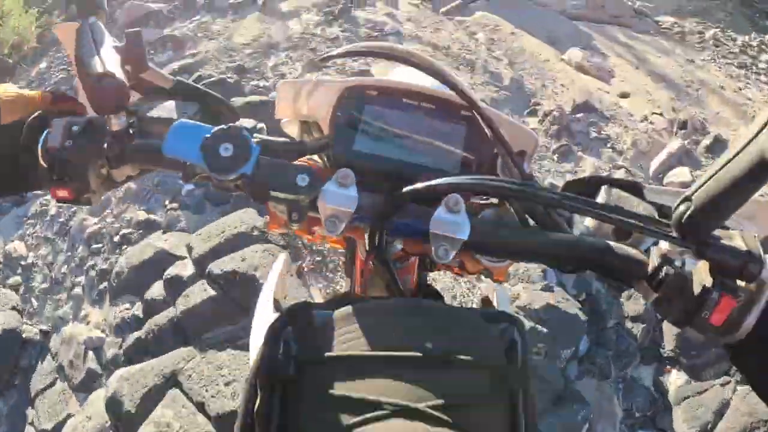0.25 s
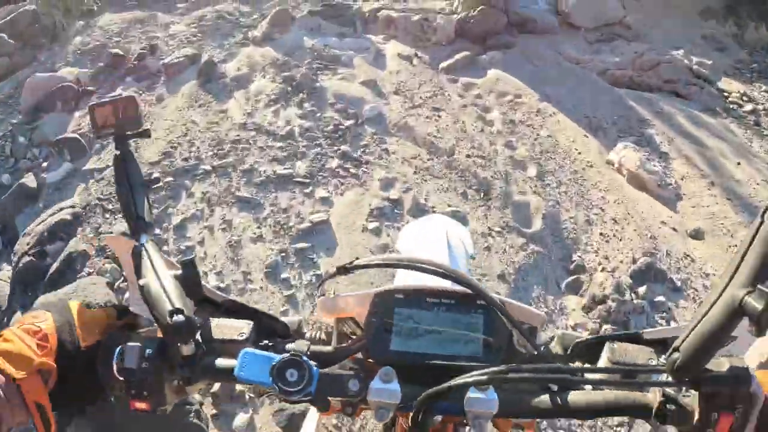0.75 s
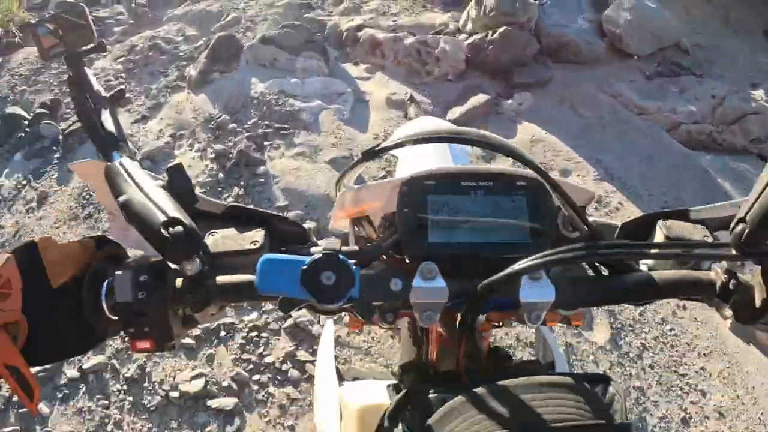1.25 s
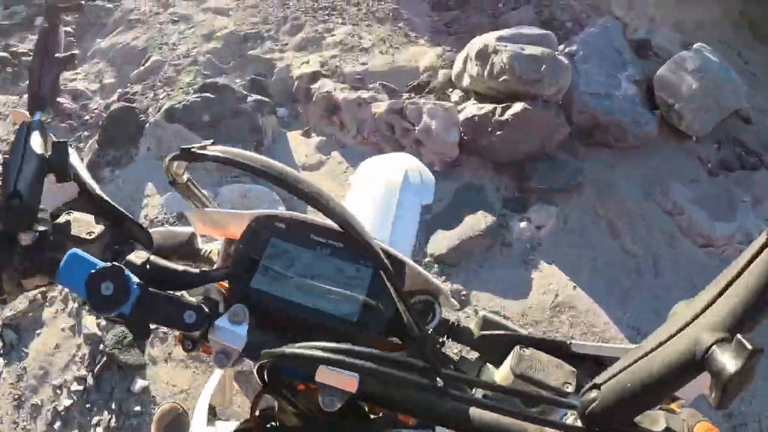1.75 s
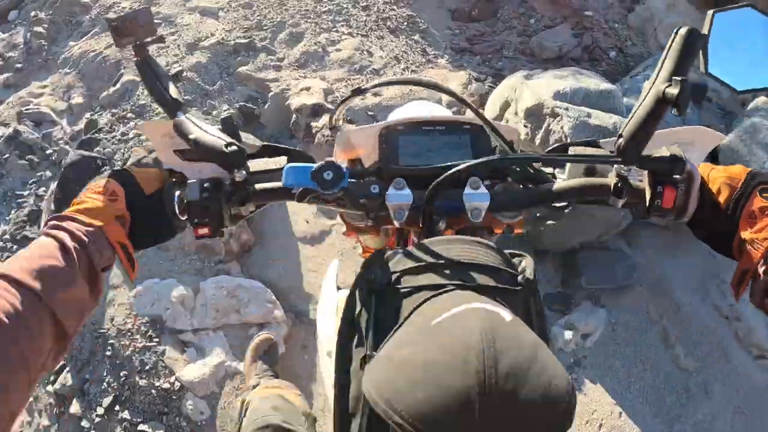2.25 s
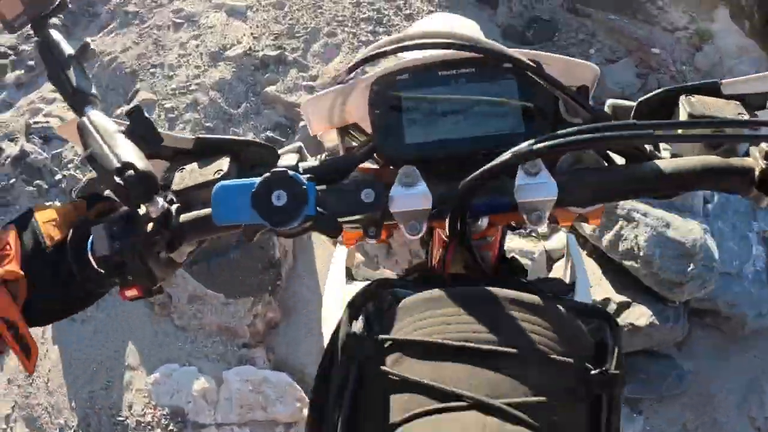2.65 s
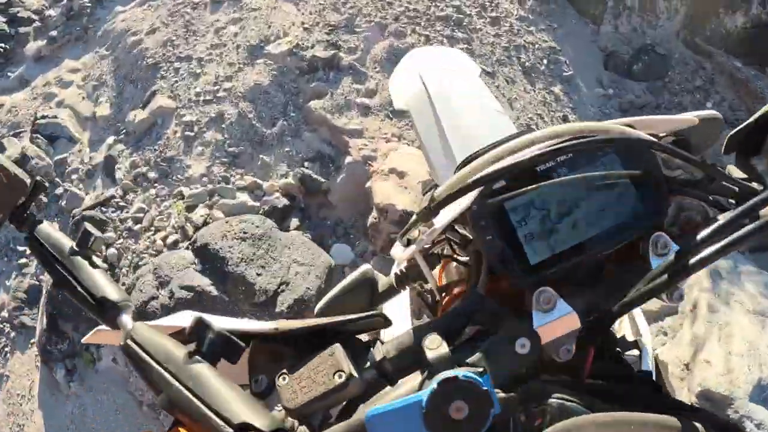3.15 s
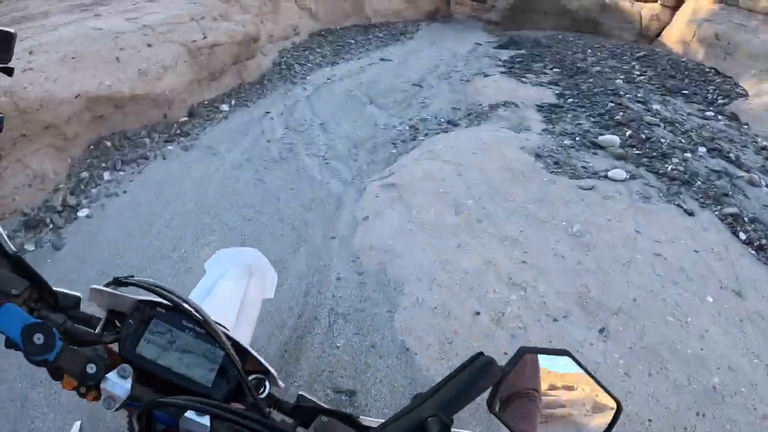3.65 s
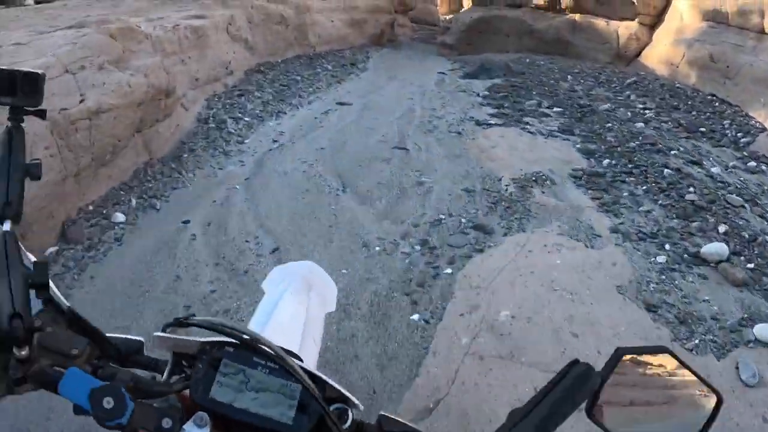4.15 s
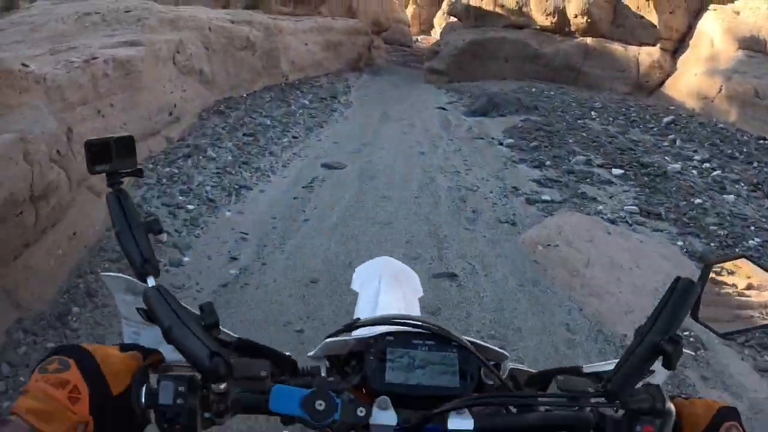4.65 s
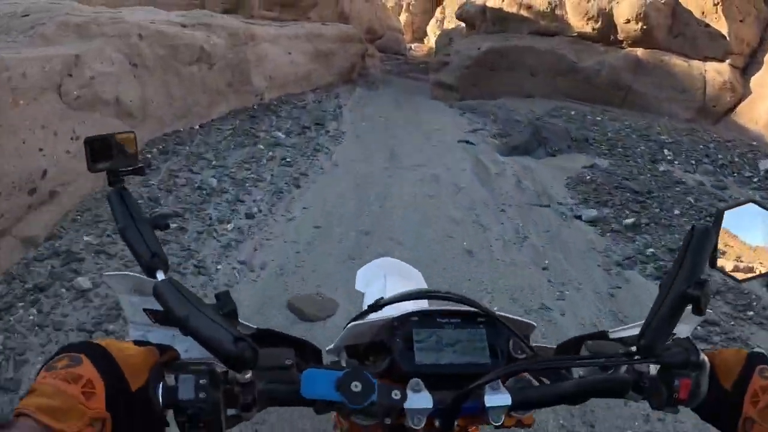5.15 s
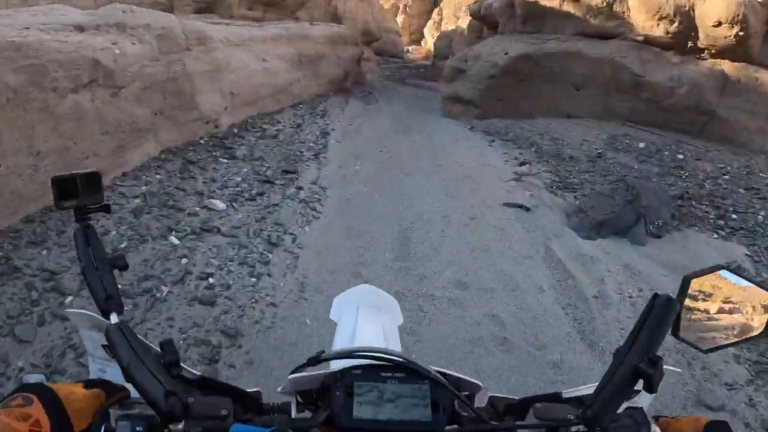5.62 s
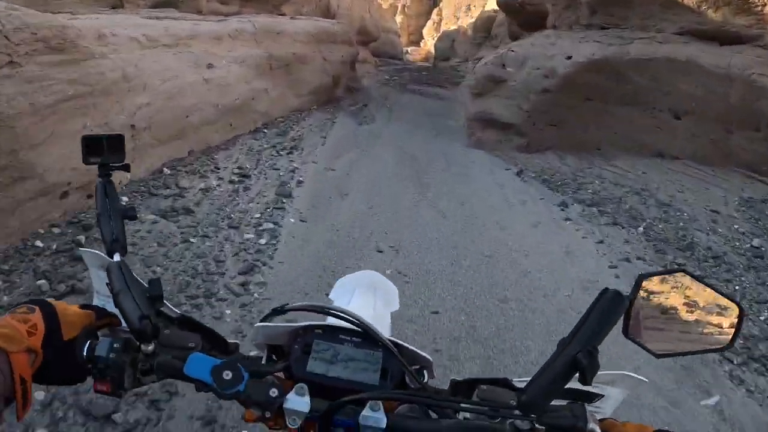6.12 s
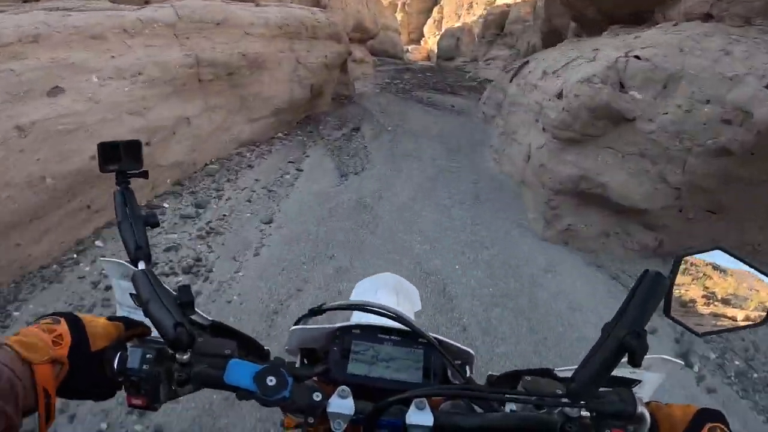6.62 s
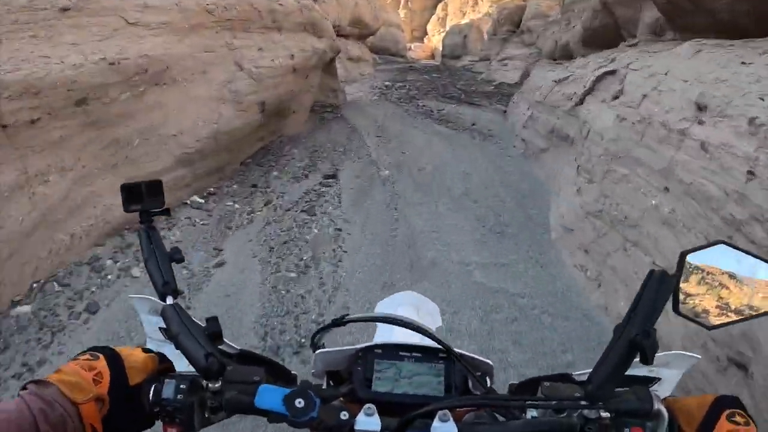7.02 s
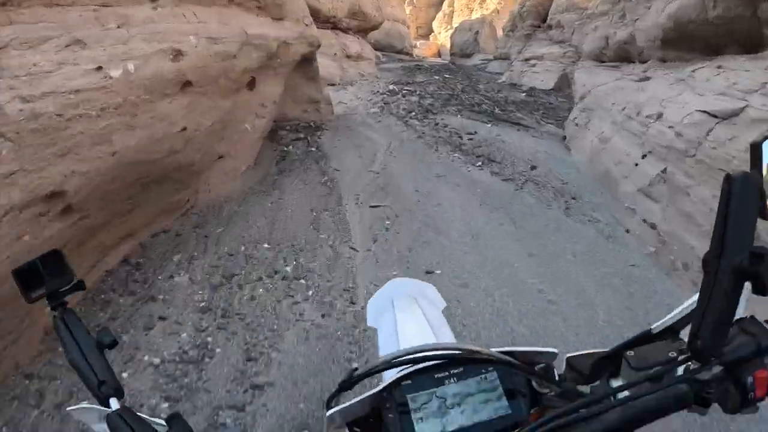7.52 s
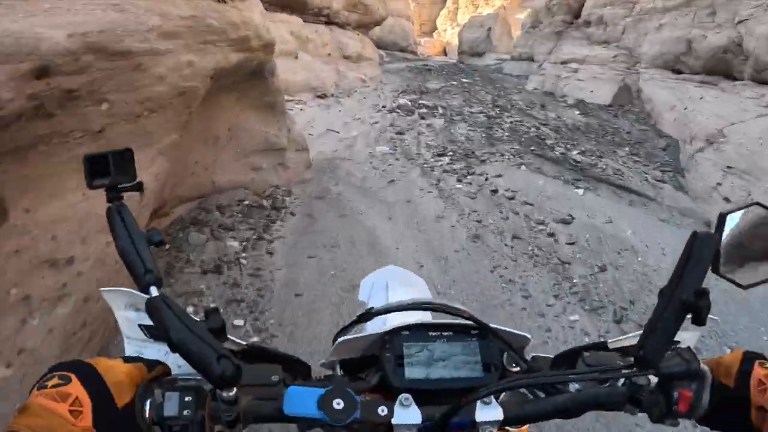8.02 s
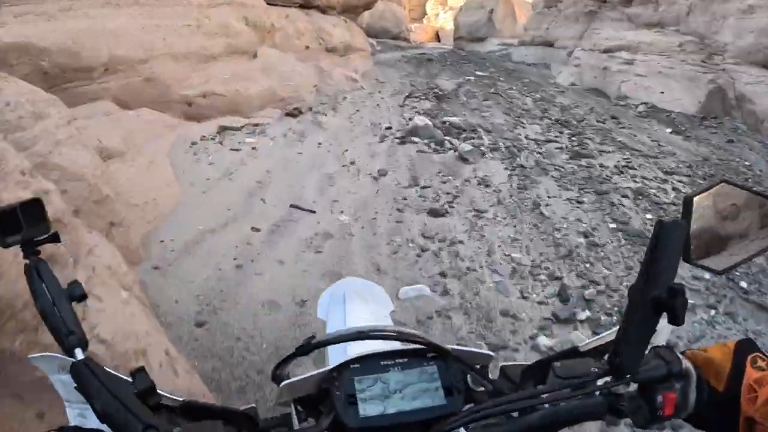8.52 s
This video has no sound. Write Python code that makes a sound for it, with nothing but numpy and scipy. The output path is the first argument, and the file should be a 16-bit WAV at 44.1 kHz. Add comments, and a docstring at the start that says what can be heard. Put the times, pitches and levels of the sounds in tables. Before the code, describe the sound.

A four-stroke single-cylinder dirt bike, heard close from the rider's chest outdoors. From 0 to 0.8 s it chugs at about 25 beats a second, dips and blips, with boxy intake thumps. The throttle closes and the beat slows to about 13 a second by 2 s: separate gritty knocks, valve ticking, soft gravel hiss and sharp stone clicks, strongest near 1.85 and 2.03. A surge runs from 2.1 to 2.7, then it sags to a lugging low near 3.1. At 3.25 it abruptly becomes a full, steady burble around 30 beats, swelling near 4.2, dropping at 4.5, climbing again to 5.7, with light clatter and whine. At 6.9 the throttle shuts and revs fall; at 7.3 it pulls hard with rasp, a click and louder gravel crunch, peaking near 7.6. It eases around 8.2, blips, and ends mid-ride near 8.8.

```python
"""On a rocky trail that turns to a gravel wash: a four-stroke single-cylinder dirt bike, from the rider's chest.
Each intake gulp rings the airbox as filtered impulses and noise; exhaust puffs ring the silencer.
Crank shake, valve clatter and gear whine follow the same engine cycle.
Tyres drum and crunch as shaped noise; stones and engine knocks sound as short ringing bursts."""
import sys
import numpy as np
from scipy import signal
from scipy.fft import rfft, irfft
from scipy.io import wavfile
from scipy.ndimage import uniform_filter1d

SR = 44100
rng = np.random.default_rng(int(sys.argv[2]) if len(sys.argv) > 2 else 0)


def pcm_store(signal):
    """Save signal as 16-bit PCM."""
    levels = np.round(np.clip(np.atleast_2d(signal), -1, 1) * 32767)
    wavfile.write(sys.argv[1], SR, levels.astype(np.int16).T)


N = 387198
TIME = np.arange(N) / SR
CRUISE_HZ = 30  # firings per second


def undb(db):
    """Decibels to gain."""
    return 10 ** (np.asarray(db) / 20)


def unit(x):
    """Scale to rms 1."""
    return x / np.sqrt(np.mean(x ** 2))


def curves(table):
    """Draw each column of a table as a control signal over time."""
    times, *columns = np.transpose(table)
    return [np.interp(TIME, times, column) for column in columns]


def noise():
    """White noise."""
    return rng.standard_normal(N)


def band(x, hz, width_hz, order=1):
    """Bandpass as a resonance; a higher order acts as several coupled ones."""
    low = np.sqrt(hz ** 2 + width_hz ** 2 / 4) - width_hz / 2
    high = min(low + width_hz, SR / 2 - 1)
    return signal.sosfilt(signal.butter(order, [low, high], "band", fs=SR, output="sos"), x)


def resonances(x, modes, order=1):
    """Sum of parallel resonances from (hz, width_hz, level_db) rows."""
    return sum(undb(level_db) * band(x, hz, width_hz, order) for hz, width_hz, level_db in modes)


def colour(x, points):
    """Shape a spectrum by (hz, level_db) points, then scale to rms 1."""
    hz, level_db = np.transpose(points)
    f = np.arange(N // 2 + 1) * SR / N
    gain = undb(np.interp(np.log(f + 1), np.log(hz), level_db))
    return unit(irfft(rfft(x) * gain, N))


def walk(rate_hz):
    """Smooth random drift of rms 1."""
    hold = int(SR / rate_hz)
    steps = np.repeat(rng.standard_normal(N // hold + 1), hold)
    return unit(uniform_filter1d(steps, hold)[:N])


def fade(x, seconds):
    """Give every impulse an exponential tail."""
    return signal.lfilter([1], [1, -np.exp(-1 / (seconds * SR))], x)


def strokes(cycle, place, scatter_db, jitter_s):
    """One impulse per engine cycle at a given place in it, each a little different."""
    times = np.interp(np.arange(1, int(cycle[-1])) + place, cycle, TIME)
    chance = rng.standard_normal((len(times), 2))
    at = ((times + jitter_s * chance[:, 0]) * SR).astype(int)
    out = np.zeros(N)
    out[np.clip(at, 0, N - 1)] = undb(scatter_db * chance[:, 1])
    return out


def bump(cycle, place, length):
    """A smooth bell-shaped gate that opens once per cycle."""
    return np.exp(-.5 * (((cycle - place + .5) % 1 - .5) / length) ** 2)


def kick(cycle, place, length):
    """A gate that snaps open once per cycle and dies away."""
    return np.exp(-((cycle - place) % 1) / length)


SHUT_DB, OPEN_DB = -19, -8  # gulp levels that count as throttle shut and open


def closure(gulp_db):
    """How far the throttle is shut, 0-1, judged from the gulp level."""
    return np.clip((OPEN_DB - gulp_db) / (OPEN_DB - SHUT_DB), 0, 1)


# longer-ringing airbox modes: hz [Hz], width_hz [Hz], level_db [dB]
AIRBOX_MODES = [(249, 11.7, 1.5), (312.4, 93, 7)]


def airbox(x):
    """The thump of the coupled airbox resonances feeds its longer-ringing modes."""
    thump = band(x, 260.1, 103.0, order=4) + undb(-11.0) * band(x, 197.6, 153.0, order=2)
    return thump + resonances(thump, AIRBOX_MODES)


# upper inlet resonances before transposition: hz [Hz], width_hz [Hz], level_db [dB]
INLET_MODES = [(363, 35, -11.5), (472, 41, -19), (555.5, 67, -15.5), (661, 58, -25)]
# upper inlet resonance gains: start_s [s], bark_db [dB], snarl_db [dB]
BARK_LEVELS = [(0, 6, -28), (.75, 9, -17), (1.3, -2, -19), (2.0, 2, -33), (2.4, 11, -29), (2.7, -2, -16),
               (3.2, 4.5, -29), (3.7, 4, -41), (4.2, 4, -41), (4.5, 2, -27), (4.8, 3, -27.5),
               (5.6, 3.5, -31), (6.3, 4.5, -30.5), (7.4, 3.5, -31), (8.78, -3, -28)]
# airbox pitch; each ring is transposed by its ratio to the rest pitch: start_s [s], pitch_hz [Hz]
AIRBOX_DRIFT = [(0, 274.6), (.45, 265.5), (.8, 278.5), (1.5, 266), (2.1, 270.7), (2.45, 272.4), (3.3, 271),
                (4.2, 271.4), (4.58, 259), (4.9, 268.5), (5.6, 266.7), (5.85, 268), (6.4, 266.6),
                (7.4, 265.7), (7.8, 273.6), (8.78, 266.5)]
AIRBOX_REST_HZ = 274
OPENING_LEAD_S, OPENING_DB = 0.01122, -18  # weak puff ahead of the gulp
SHUT_ROUGH, OPEN_ROUGH = 0.55, 0.04  # turbulent share of the gulp, 0-1


def intake(cycle, gulp_db):
    """Each gulp of air rings the airbox at a drifting pitch; a nearly shut throttle makes it turbulent."""
    rough = np.clip(OPEN_ROUGH + (SHUT_ROUGH - OPEN_ROUGH) * closure(gulp_db) ** 2, 0, 1)

    # the rings of one push of air
    age = np.arange(SR // 8) / SR
    push = signal.unit_impulse(len(age))
    boom = airbox(push)
    bark = band(resonances(push, INLET_MODES, order=2), 521, 330, order=3)
    snarl = band(push, 769, 264, order=5)
    opening = band(push, 315.8, 100, order=3)
    opening = undb(OPENING_DB) * opening / opening.max()

    bark_s, bark_db, snarl_db = np.transpose(BARK_LEVELS)
    ring = np.zeros(N)
    for s in np.interp(np.arange(1, int(cycle[-1]) + 1), cycle, TIME):
        span = slice(max(int((s - OPENING_LEAD_S) * SR), 0), int(s * SR) + len(age))
        transpose = np.interp(s, *np.transpose(AIRBOX_DRIFT)) / AIRBOX_REST_HZ
        since = (TIME[span] - s) * transpose
        gulp = boom + undb(np.interp(s, bark_s, bark_db)) * bark
        gulp = gulp + undb(np.interp(s, bark_s, snarl_db)) * snarl
        ring[span] += np.interp(since, age, gulp / boom.max())
        ring[span] += np.interp(since + OPENING_LEAD_S, age, opening)

    # air tears past the throttle plate while the inlet valve is open
    flow = bump(cycle, 0, .11) + 1.3 * rough ** 2 + .1
    rush = unit(airbox(noise() * flow))
    clean = undb(-1.0) * np.sqrt(1 - rough ** 2) * ring
    return undb(gulp_db) * (clean + undb(-7) * rough * rush)


# cylinder and header pipe modes: hz [Hz], width_hz [Hz], level_db [dB]
HEADER_MODES = [(547.4, 42, 5), (812, 112, -8)]


def combustion(cycle, level_db):
    """Every power stroke rings the cylinder and header pipe with a short hollow note."""
    blow = strokes(cycle, .57, scatter_db=1.3, jitter_s=.00003)
    return undb(level_db) * unit(resonances(blow, HEADER_MODES, order=2))


# silencer resonances: hz [Hz], width_hz [Hz], level_db [dB]
SILENCER_MODES = [(110, 3.7, -6), (159, 18, 3), (206, 52, 9.5), (533, 11, 9)]


def exhaust(cycle, gulp_db):
    """Puffs ring the silencer; they grow with the throttle and are heavier when the engine lugs."""
    blowdown = strokes(cycle, .9, scatter_db=1.2, jitter_s=.00004)
    sweep = strokes(cycle, .63, scatter_db=1.5, jitter_s=.00008)
    pipe = resonances(blowdown + undb(2) * sweep, SILENCER_MODES)
    heavy = (CRUISE_HZ / (np.gradient(cycle) * SR)) ** .8
    return undb(-35.0 + 1.1 * gulp_db) * heavy * unit(band(pipe, 202, 600, order=3))


LUG_HZ, SMOOTH_HZ = 7.8, 26.6  # firings per second: full below the first, gone above the second


def lugging(cycle, firing_hz):
    """At low revs every power stroke knocks as a gritty burst, and air hisses past the throttle plate."""
    share = np.clip((SMOOTH_HZ - firing_hz) / (SMOOTH_HZ - LUG_HZ), 0, 1)
    grit = noise() * undb(3 * walk(700))
    body = band(band(grit, 1300, 2100, order=2), 2400, 3000)
    burst = unit(body + undb(2) * band(grit, 2536, 170, order=2))
    thud = undb(-28.0) * bump(cycle, place=.64, length=.085) * burst
    air = unit(band(noise(), 8740, 3000, order=3))
    hiss = undb(-47.5 + .8 * walk(15.0)) * bump(cycle, place=0.15, length=0.053) * air
    return share * (thud + hiss)


# crank shake lines before the panels: order [multiple of the firing rate], level_db [dB]
SHAKE_ORDERS = [(2, -1), (3, -32.5), (4, -2), (5, -1), (6, -5), (7, -5.5)]


def shake(cycle, level_db):
    """The unbalanced piston shakes the bike; crank orders swell near the body panels' resonance."""
    lines = sum(undb(order_db + 1.5 * walk(6)) * np.sin(2 * np.pi * order * cycle)
                for order, order_db in SHAKE_ORDERS)
    return undb(level_db) * unit(band(band(lines, 125.7, 71), 138.0, 100))


def tooth_load(cycle):
    """Gear teeth are pressed hardest on the power stroke and again as the inlet cam lifts."""
    return 0.45 + bump(cycle, 0.64, 0.098) + 0.5 * bump(cycle, 0.068, 0.14)


# gear meshes: teeth [per cycle, rounded when played], slow_db [dB, low revs], fast_db [dB, cruise]
GEAR_MESHES = [(52, -3, -14.5), (63.23, 1, 5.5), (82.2, -4, -14.5), (90.2, -12.5, -4.5),
               (105.3, -6.5, -9.5), (128.2, -5.5, -2.5)]
SURGE = .014  # share by which the crank speeds up and slows down in a cycle at cruise; more at low revs


def gears(cycle, whine_db):
    """Gear meshes whine, smeared by backlash and crank surge, and ring through the cases."""
    firing_hz = np.gradient(cycle) * SR
    drive = np.clip((firing_hz - 28.5) / 1.5, 0, 1)  # from low revs to cruise
    surge = SURGE * (CRUISE_HZ / firing_hz) ** 2 * np.sin(2 * np.pi * cycle) / (2 * np.pi)
    mesh = np.zeros(N)
    for teeth, slow_db, fast_db in GEAR_MESHES:
        backlash = .55 + walk(170) + 1j * walk(170)
        tone = np.exp(2j * np.pi * round(teeth) * (cycle + surge))
        mesh += undb(slow_db + (fast_db - slow_db) * drive) * (tone * backlash).real
    whine = band(tooth_load(cycle) * mesh, 1840, 2300, order=2)
    return undb(whine_db - 7.0) * unit(whine + undb(-2) * band(whine, 1500, 280))


# clutch cover modes: hz [Hz], width_hz [Hz], level_db [dB]
COVER_MODES = [(2093, 81, -1), (2955, 130, -13), (3410, 130, -14)]


def cover(cycle, level_db):
    """Chattering gear teeth set a clutch cover singing, in pulses with the load."""
    load = tooth_load(cycle)
    song = resonances(load * noise(), COVER_MODES, order=2)
    return undb(level_db) * unit(load * song)


# drive train resonances: hz [Hz], width_hz [Hz], level_db [dB]
RASP_MODES = [(1286, 283, -3), (1800, 590, -1.5), (2080, 160, -11.5), (2540, 160, -3.5), (3554, 210, -6.5)]


def rasp(cycle, level_db):
    """Under load the drive train chatters in rough bursts within each cycle."""
    gate = .5 + kick(cycle, .64, .3) + .6 * kick(cycle, .04, .2)
    chatter = noise() * undb(2.5 * walk(400)) * gate
    return undb(level_db) * unit(resonances(chatter, RASP_MODES, order=2))


# clatter level before trim: cruise_db [dB], speed_db [dB per doubling of speed],
# pull_db [dB at full pull], shut_db [dB with the throttle shut]
CLATTER_LEVEL_LAW = (-35, 1, 3.5, -3)
FULL_PULL_HZ_PER_S, PULL_S = 72, 0.5  # gain in firing rate that counts as full pull; averaging time


def clatter_level(firing_hz, gulp_db):
    """Clatter follows the speed, how hard the engine pulls, and the throttle."""
    cruise_db, speed_db, pull_db, shut_db = CLATTER_LEVEL_LAW
    gaining = np.clip(np.gradient(firing_hz) * SR / FULL_PULL_HZ_PER_S, 0, 1)
    pull = uniform_filter1d(gaining, int(PULL_S * SR))
    speed = np.log2(firing_hz / CRUISE_HZ)
    return cruise_db + speed_db * speed + pull_db * pull + shut_db * closure(gulp_db)


# knocks of exhaust valve, combustion, and a further late knock: place [0-1 of cycle], length [cycles], level_db
# [dB]
CYCLE_KNOCKS = [(.04, 0.64, 4), (0.66, 0.23, 5), (.8, .1, 2.5)]
# engine case modes: hz [Hz], width_hz [Hz], level_db [dB]
CASE_MODES = [(1920, 180, 6.5), (2420, 210, -7.5), (3370, 360, -5.5), (3860, 640, -1), (5200, 210, 3),
              (6100, 78, 3.5), (6970, 280, -7)]
# clatter spectrum: hz [Hz], level_db [dB]
CLATTER_COLOUR = [(400, -20), (800, -12.5), (1020, -11), (1300, 0.5), (1900, -6.5), (2600, 0), (3500, -7),
                  (5000, -12), (7000, -16), (9000, -25.5), (11000, -31), (12300, -49), (14000, -56)]


def clatter(cycle, level_db):
    """Valves and piston knock on the cases: a repeating ring, and loose rattle dying after each knock."""
    hits = sum(undb(knock_db) * strokes(cycle, place, scatter_db=1.5, jitter_s=.00002)
               for place, _, knock_db in CYCLE_KNOCKS)
    tail = (noise() * np.exp(-TIME / 0.0081))[:SR // 20]
    ring = unit(band(signal.fftconvolve(hits, tail)[:N], 1500, 3200))
    gate = sum(undb(knock_db) * kick(cycle, place, length) for place, length, knock_db in CYCLE_KNOCKS)
    # the cam chain fills the gaps between knocks as the engine speeds up
    chain = (np.gradient(cycle) * SR / 50) ** 2
    rattle = unit(noise() * (gate / gate.max() * undb(1.6 * walk(60)) + chain))
    blows = rattle + undb(-9) * ring
    cases = blows + resonances(blows, CASE_MODES)
    return undb(level_db - 2.5) * colour(cases, CLATTER_COLOUR)


# stone hits and short engine knocks and rattles: start_s [s], peak_db [dB], ring_hz [Hz],
# ring_over_crack_db [dB, before the final band], decay_s [s]
KNOCK_BURSTS = [(1.233, -25, 3900, 5, 0.044), (1.412, -23.5, 4480, 0, 0.0034),
                (1.471, -36, 1900, 5, 0.0044), (1.847, -13, 2420, 8, 0.0026),
                (2.031, -18.5, 2600, 31, 0.0088), (2.098, -27, 3400, 19, 0.0048),
                (2.315, -22, 3340, 10, 0.0036), (2.357, -26, 3300, 21, 0.0062),
                (3.673, -23, 4620, 14, 0.0028), (4.527, -23, 2150, 23, .005),
                (4.566, -22, 2200, 21.5, 0.0048), (5.301, -27, 2120, 21, 0.0037),
                (7.389, -18.5, 3700, 15, 0.0062), (8.65, -32, 2800, 5, 0.0046)]


def stones_and_knocks():
    """Stone hits and short engine knocks and rattles: a short broad crack and a brief ring."""
    out = np.zeros(N)
    age = TIME[:SR // 10]
    for start_s, peak_db, ring_hz, ring_over_crack_db, decay_s in KNOCK_BURSTS:
        blow = rng.standard_normal(len(age)) * np.exp(-age / decay_s)
        crack = band(blow, 3400, 3900)
        ring = undb(ring_over_crack_db) * band(blow, ring_hz, ring_hz / 12, order=2)
        burst = band(crack + ring, 2100, 5400, order=2)
        at = int(start_s * SR)
        out[at:at + len(age)] += (undb(peak_db) * burst / np.abs(burst).max())[:N - at]
    return out


# gravel spectrum: hz [Hz], level_db [dB]
GRAVEL_COLOUR = [(500, -25), (1500, 7), (3000, 5.5), (5000, 0.5), (7000, -6.5), (8500, -14), (10000, -17.5),
                 (11400, -26.5), (12300, -52.5), (15000, -57.5)]
# tyre rumble spectrum: hz [Hz], level_db [dB]
TYRE_COLOUR = [(25, -35), (60, -24), (120, -9.5), (250, 12), (400, -11), (480, -3), (545, -0.5), (620, -1),
               (720, -5.5), (900, -9), (1020, -20.5), (2000, -12), (5000, -48)]


def tyres(rumble_db, crunch_db, drone_db):
    """Knobs drum and drone on the ground and grind a dense stream of small stones over hissing sand."""
    grain_gain = undb(2 * np.minimum(rng.exponential(size=N), 5))
    grains = (rng.random(N) < 700 / SR) * grain_gain  # about 700 a second
    crunch = colour(noise() * (fade(grains, .0012) + 1.0), GRAVEL_COLOUR)  # 1.0 is the steady hiss
    rumble = colour(noise() * undb(1.4 * walk(25)), TYRE_COLOUR)
    drone = unit(band(noise(), 765, 190, order=3))
    return undb(crunch_db + 6.5) * crunch + undb(rumble_db - 2.5) * rumble + undb(drone_db) * drone


# engine speed; the crank turns twice per firing: start_s [s], firing_hz [firings per second]
ENGINE_SPEED = [(0.0, 24.92), (0.68, 22.51), (0.8, 27.45), (0.93, 18.14), (1.44, 14.32), (2.06, 13.13),
                (2.2, 19.1), (2.52, 27.04), (2.68, 28.74), (2.84, 16.05), (3.13, 12.56), (3.25, 29.55),
                (3.42, 28.87), (3.53, 31.3), (3.64, 32.99), (3.72, 33.58), (3.85, 32.47), (3.98, 32.58),
                (4.1, 33.36), (4.21, 35.43), (4.35, 29.96), (4.48, 26.36), (4.57, 25.19), (4.68, 27.48),
                (4.83, 26.95), (4.93, 27.92), (5.03, 29.82), (5.15, 29.27), (5.26, 30.83), (5.45, 32.59),
                (5.58, 34.3), (5.67, 34.68), (5.76, 33.55), (5.85, 33.37), (5.96, 30.51), (6.11, 29.18),
                (6.22, 28.73), (6.4, 29.47), (6.62, 29.23), (6.85, 29.82), (7.12, 23.14), (7.35, 28.78),
                (7.57, 34.65), (7.7, 32.55), (7.88, 29.3), (8.1, 28.8), (8.38, 21.6), (8.48, 27.45),
                (8.78, 23.81)]
# throttle, as relative intake level: start_s [s], gulp_db [dB]
THROTTLE = [(0.0, -8), (0.3, -9.5), (0.35, -13.5), (0.5, -18), (0.6, -10.5), (0.78, -8), (0.82, -6.5),
            (0.86, -24), (1.28, -10.5), (1.92, -13), (2.12, -0.5), (2.23, -14), (2.46, -2), (2.56, -3.5),
            (2.79, -23.5), (2.86, -14), (3.0, -11.5), (3.07, -24), (3.15, -12.5), (3.21, -15.5), (3.25, -2),
            (4.58, -5.5), (4.64, -2.5), (5.75, -4), (6.8, -5.5), (6.89, -21), (7.13, -15.5), (7.38, -1.5),
            (8.06, -7), (8.17, -28), (8.37, -14), (8.5, -7), (8.57, -17), (8.68, -6), (8.78, -15.5)]
# hollow combustion ring: start_s [s], level_db [dB]
HOLLOW_LEVEL = [(0, -40), (.35, -55), (.5, -33.5), (1.05, -34.5), (1.5, -32), (2.1, -36.5), (2.6, -46),
                (3, -41), (3.4, -37), (4.4, -40), (5.5, -38.5), (6.9, -35.5), (7.3, -29), (7.7, -42),
                (8.2, -35), (8.78, -30)]
# crank shake: start_s [s], level_db [dB]
SHAKE_LEVEL = [(0, -36.5), (.8, -32.5), (1.2, -35.5), (2, -34), (2.5, -31), (2.9, -37.5), (3.4, -34),
               (4.1, -33), (4.5, -34), (5.1, -39.5), (5.6, -33.5), (6.2, -33), (6.9, -32.5), (7.5, -30.5),
               (8.1, -33.5), (8.3, -36.5), (8.78, -32)]
# gear whine before trim: start_s [s], whine_db [dB]
WHINE_LEVEL = [(0, -26), (.3, -25.5), (.55, -34), (1, -29.5), (2.1, -29), (2.33, -23.5), (2.62, -25),
               (2.78, -30.5), (3.15, -32), (3.3, -28), (3.6, -35), (4.05, -30.5), (4.38, -32), (4.5, -29),
               (4.62, -29), (4.8, -39.5), (5.1, -37), (5.6, -41), (6.1, -31.5), (6.7, -27.5), (7.05, -40),
               (7.35, -32.5), (7.85, -29), (8.15, -45), (8.6, -29)]
# clutch cover song: start_s [s], level_db [dB]
COVER_LEVEL = [(3.3, -70), (3.5, -42), (3.8, -45), (3.95, -35), (4.2, -40.5), (4.35, -47), (5.1, -39.5),
               (5.24, -33.5), (5.6, -35), (5.92, -35), (6.1, -49), (7.4, -52), (7.7, -47), (8, -70)]
# drive train rasp: start_s [s], level_db [dB]
RASP_LEVEL = [(0, -47), (.38, -36), (.55, -32), (.88, -32.5), (1.0, -42.5), (2.15, -50), (2.4, -41),
              (2.65, -33.5), (2.8, -53), (4.2, -49), (4.45, -36.5), (4.7, -37.5), (7.12, -39.5),
              (7.3, -28.5), (7.55, -33.5), (7.8, -32.5), (8.15, -37.5), (8.4, -35.5), (8.55, -30),
              (8.78, -38)]
# ground under the tyres before trim: start_s [s], rumble_db [dB], crunch_db [dB]
GROUND_LEVELS = [(0, -23, -45), (.8, -30.5, -42.5), (1.4, -27, -46.5), (2.4, -21.5, -43), (2.9, -27.5, -46),
                 (3.7, -28.5, -55.5), (4.5, -26, -47.5), (5.5, -29.5, -50), (6.5, -23, -42.5),
                 (7.1, -26.5, -44), (7.3, -19, -36.5), (7.5, -31, -39.5), (7.9, -23, -38),
                 (8.35, -25.5, -42.5), (8.65, -22.5, -37)]
# drone of the tyre knobs: start_s [s], drone_db [dB]
DRONE_LEVEL = [(0, -51), (.8, -35), (1.3, -40.5), (2.4, -40.5), (3.2, -45.5), (5.5, -41), (6.3, -39.5),
               (6.9, -32), (7.6, -40), (8.2, -31.5), (8.78, -32.5)]


def scene():
    """Speed and throttle drive the engine on one cycle count, whole at each intake; the ground runs free."""
    firing_hz, = curves(ENGINE_SPEED)
    gulp_db, = curves(THROTTLE)
    airbox_swell_s = .0113  # the count runs ahead by this time
    cycle = np.cumsum(firing_hz) / SR + airbox_swell_s * firing_hz

    breath = intake(cycle, gulp_db) + combustion(cycle, *curves(HOLLOW_LEVEL)) + exhaust(cycle, gulp_db)
    machinery = lugging(cycle, firing_hz) + shake(cycle, *curves(SHAKE_LEVEL))
    machinery += gears(cycle, *curves(WHINE_LEVEL)) + cover(cycle, *curves(COVER_LEVEL))
    machinery += rasp(cycle, *curves(RASP_LEVEL)) + clatter(cycle, clatter_level(firing_hz, gulp_db))
    ground = tyres(*curves(GROUND_LEVELS), *curves(DRONE_LEVEL))
    return (breath + machinery + stones_and_knocks() + ground)[None]


def record(dry):
    """The microphone port notches the treble, the loudest peaks are rounded and the top is cut off."""
    ported = dry - 0.77 * band(dry, 8980, 750)
    rounded = ported / (1 + (ported / .9) ** 8) ** (1 / 8)
    top_hz = 15200
    return signal.sosfilt(signal.ellip(8, .2, 70, top_hz, fs=SR, output="sos"), rounded)


dry = scene()
out = record(dry)
pcm_store(out)
```